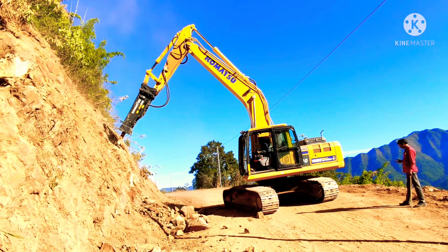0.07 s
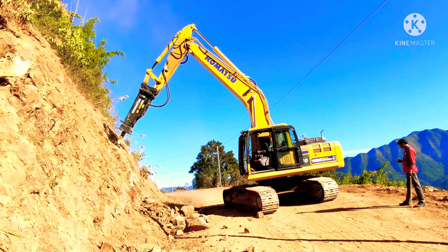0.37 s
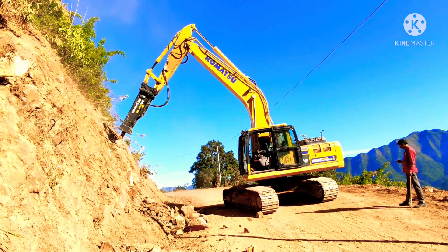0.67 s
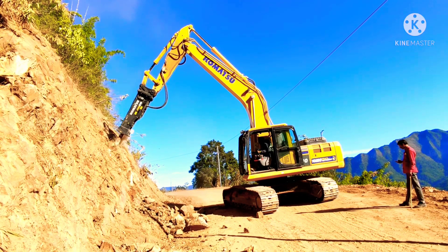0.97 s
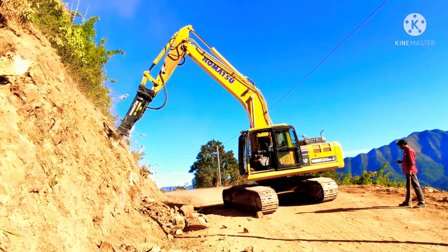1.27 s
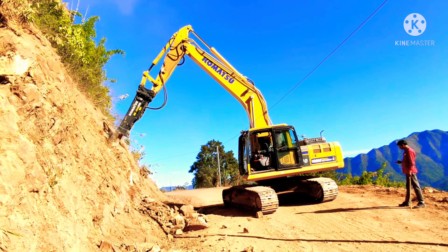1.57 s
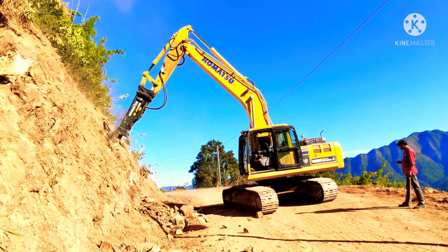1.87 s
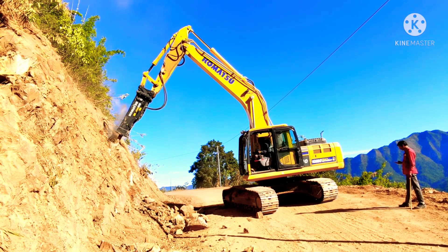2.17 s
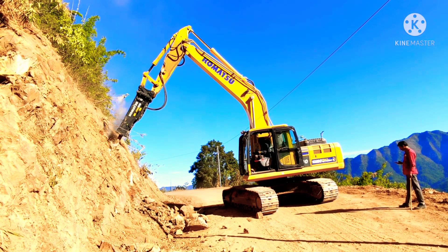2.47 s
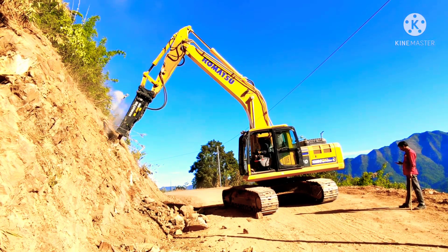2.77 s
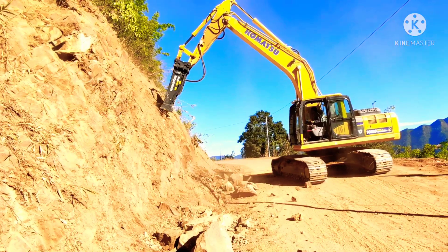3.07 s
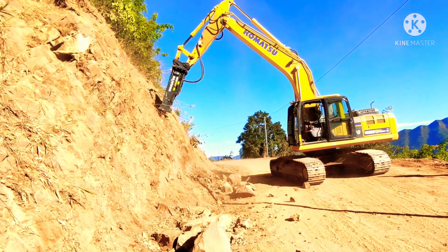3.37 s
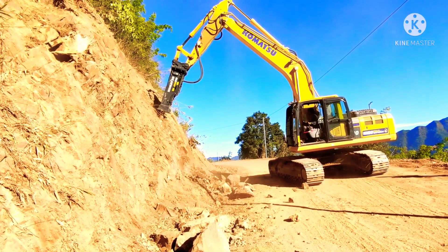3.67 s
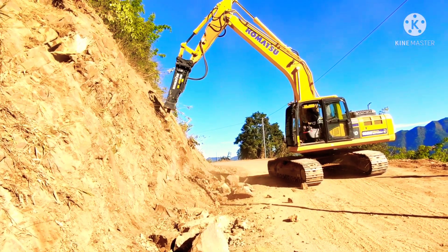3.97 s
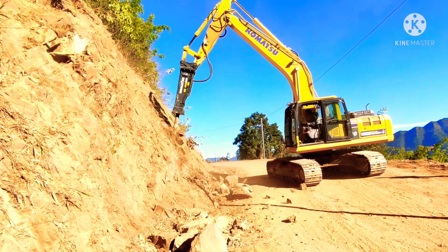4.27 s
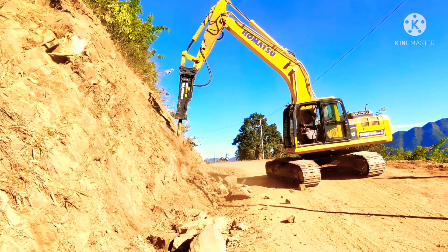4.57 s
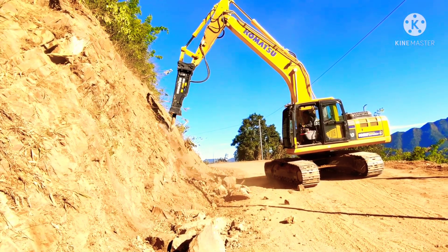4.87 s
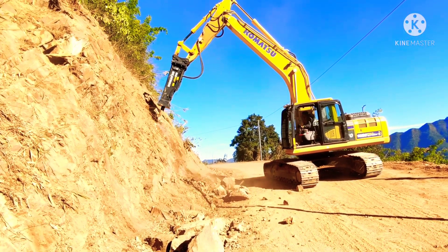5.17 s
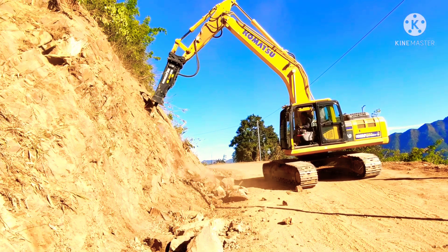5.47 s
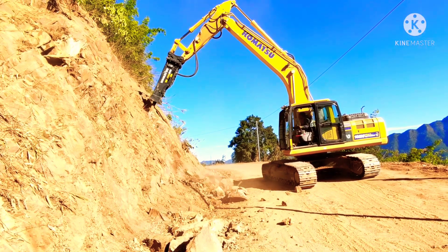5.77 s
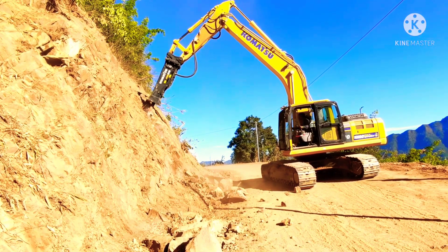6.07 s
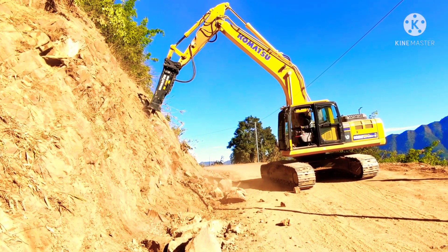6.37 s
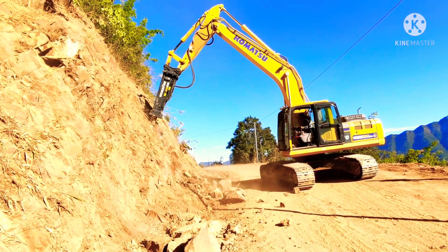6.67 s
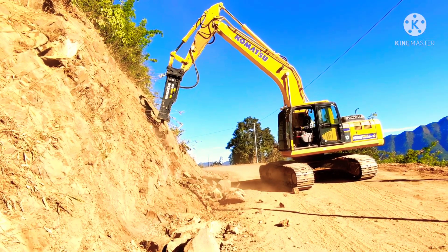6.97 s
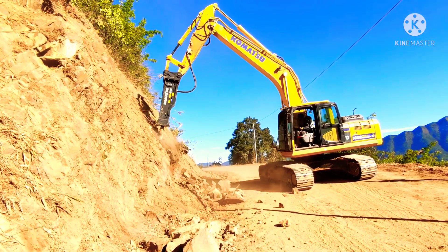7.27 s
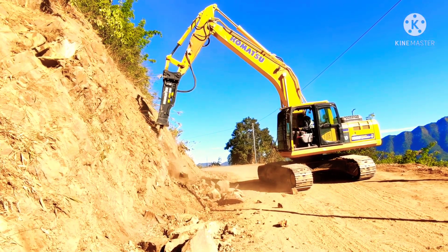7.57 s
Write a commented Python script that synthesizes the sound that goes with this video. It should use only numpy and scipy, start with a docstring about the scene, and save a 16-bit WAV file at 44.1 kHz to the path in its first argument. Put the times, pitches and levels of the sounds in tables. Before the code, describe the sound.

Rapid, sharp metallic blows from a hydraulic breaker strike stone over a rumbling diesel, heard from a moderate distance in the open with a slight echo. After a very brief dip to silence the hammering soon ends, and the steel tip pries at the bank with clangs and scrapes. Rocks split and fall with dull thuds and crunches, heaviest near the end, while the pump whines and valves give high squirts.

```python
"""Hydraulic breaker on a rocky bank

An excavator works some twenty metres away in the open. Its piston hammers the ringing steel chisel
about seven times a second, each blow booming through the breaker's box. The sound fades out and back
in; then the chisel prises at the face, and rocks split, tumble and trail off into rubble and grit.
Underneath, the diesel sags and swells with each load, the pump whines and oil hisses through valves."""
import sys
import numpy as np
from scipy import signal
from scipy.fft import rfft, irfft, next_fast_len
from scipy.io import wavfile

SR = 44100
rng = np.random.default_rng(int(sys.argv[2]) if len(sys.argv) > 2 else 0)


def digitize_waveform(pressure):
    """Quantize a signal to 16-bit integers and store it at the path in sys.argv[1].

    Rows of a 2-D input are taken as channels; values are limited to [-1, 1].
    """
    field = np.atleast_2d(pressure).T
    bounded = np.clip(field, -1, 1)
    quanta = np.round(bounded * 32767).astype(np.int16)
    wavfile.write(sys.argv[1], SR, quanta)


N = 344862
TIME = np.arange(N) / SR
AGE = TIME[:SR * 2 // 5]  # seconds since the start of a single hit
STONE_PATCHY_DB, STONE_PATCH_HZ = 5.5, 150  # depth and width of each stone's own resonances

# rocks breaking off and landing: start_s, level_db, crush (0 whole, 1 ground to pieces), pitch_hz
ROCK_HITS = [(.785, -16.5, 0.51, 360), (0.854, -15, 1, 358.5), (.939, -11.5, 0.54, 340),
             (.995, -15, 0.75, 332), (1.083, -14.5, .3, 320), (1.125, -19, .25, 291),
             (1.241, -21, 0.045, 262), (3.146, -13, 0.42, 186), (4.22, -16.5, 0.6, 370),
             (4.264, -15, 0.57, 367), (4.353, -14, 0.072, 396), (4.492, -26.5, .1, 384),
             (4.535, -22, .05, 332), (4.58, -27.5, 0.054, 352), (4.698, -26.5, 0.95, 306),
             (4.742, -22.5, 0.89, 298), (4.771, -16.5, 1, 249), (4.824, -15, 0.62, 437),
             (5.29, -24, .1, 347), (5.382, -22.5, .1, 332.4), (5.555, -28, .05, 286),
             (5.626, -29.5, .1, 367), (5.71, -32.5, 0.11, 324), (6.25, -20, 0.082, 415),
             (6.592, -10.5, 0.12, 348.6), (6.618, -19.5, 0.3, 400), (6.721, -27.5, 0.98, 377),
             (6.885, -19.5, .11, 357), (6.945, -20, 0.14, 316), (6.988, -15, 0.69, 376),
             (7.015, -17, 0.46, 407), (7.052, -24, 0.34, 317), (7.084, -14.5, 0.48, 330),
             (7.106, -10, 0.57, 337), (7.136, -14, 0.4, 361), (7.284, -12.5, 0.16, 297),
             (7.299, -12.5, 0.017, 365), (7.365, -22, 0.37, 397), (7.453, -18.5, 0.25, 381),
             (7.503, -20, 0.33, 315), (7.549, -29, 0.18, 396), (7.689, -17.5, 0.077, 373),
             (7.73, -31, .05, 297)]
# a boulder's dull thump: freq_hz, density_db
THUMP_SPECTRUM = [(60, -28), (140, -6), (230, -6.5), (300, 0.5), (385, -4.5), (470, -9), (560, -14.5),
                  (690, -8), (850, -10), (1100, -18.5), (1600, -22.5), (3000, -52.5)]
# the crunch of crumbling stone: freq_hz, density_db
CRUNCH_SPECTRUM = [(200, -10), (600, -3.5), (900, -13.5), (1400, 6.5), (1900, -1), (2500, 0.5), (3300, -10),
                   (4100, -8.5), (5500, -17), (7000, -23), (9000, -32), (13000, -43), (16000, -59)]
# the bright crack of a blow or a snapping chip: freq_hz, density_db
CRACK_SPECTRUM = [(35, -30), (110, -6), (800, 13.5), (2400, 2), (3800, 5.5), (6000, 1.5), (7800, 1),
                  (10000, 1), (12400, -9), (13400, -14), (14400, -19), (16000, -55)]


def gain_of(db):
    """Decibels to amplitude."""
    return 10 ** (np.asarray(db) / 20)


def unit_rms(x):
    """Scales to rms 1."""
    return x / np.sqrt(np.mean(x ** 2) + 1e-20)


def automation(points):
    """Joins (time_s, value) points into a curve over the whole scene."""
    return np.interp(TIME, *np.transpose(points))


def value_at(points, hz):
    """Reads (freq_hz, value) points on a log-frequency axis."""
    freq_hz, value = np.transpose(points)
    return np.interp(np.log(hz + 1), np.log(freq_hz + 1), value)


def add(mix, start_s, *sounds):
    """Drops sounds into a stereo mix; a mono sound goes to both channels."""
    for sound in map(np.atleast_2d, sounds):
        part = mix[:, max(round(start_s * SR), 0):][:, :sound.shape[1]]
        part += sound[:, :part.shape[1]]


def wander(rate, t):
    """Random drift of rms 1 that finds a new target rate times a second."""
    knots = np.arange(0, t[-1] + 1, 1 / rate)
    return unit_rms(np.interp(t, knots, rng.standard_normal(len(knots))))


def lagged(x, lag_s):
    """Follows x with the given time constant."""
    keep = np.exp(-1 / (lag_s * SR))
    return signal.lfilter([1 - keep], [1, -keep], x)


def envelope(rise_s, t60_s, hold_until_s=0):
    """Linear attack, optional hold, exponential decay."""
    decaying_s = np.maximum(AGE - max(rise_s, hold_until_s), 0)
    return np.minimum(AGE / rise_s, 1) * gain_of(-60 * decaying_s / t60_s)


def colour(x, spectrum, patchy_db=0, size=4096):
    """Minimum-phase EQ with optional random resonances; white noise keeps its level."""
    hz, knots = abs(np.fft.fftfreq(size, 1 / SR)), np.arange(size // 8)
    bumps = np.clip(rng.standard_normal(len(knots)), -2, 1)
    patches_db = patchy_db * np.interp(hz / STONE_PATCH_HZ, knots, bumps)
    log_gain = np.log(unit_rms(gain_of(value_at(spectrum, hz) + patches_db)))
    taps = np.fft.ifft(np.exp(np.conj(signal.hilbert(log_gain)))).real[:size // 2]
    return signal.oaconvolve(x, taps[None], axes=1)[:, :N]


def stereo_image(pair, lag_ms):
    """Blends two signals into an image that is tight in the bass and wide on top, the left side late."""
    # how alike the two sides are: freq_hz, likeness (0 to 1)
    coherence = [(30, 0), (70, 1), (150, 0.98), (300, 1), (640, 0.57), (1400, 0.57), (4000, 0.16),
                 (15000, 0.02)]
    size = next_fast_len(N + 1000)
    common, other = rfft(pair, size)
    hz = np.fft.rfftfreq(size, 1 / SR)
    likeness = np.clip(value_at(coherence, hz), 0, 1)
    left = common * np.exp(-2j * np.pi * hz * lag_ms / 1000)
    right = likeness * common + np.sqrt(1 - likeness ** 2) * other
    return irfft(np.array([left, right]), size)[:, :N]


def burst(spectrum, db, rise_s, t60_s, grain_db=3, grains_per_s=700, snaps_per_s=0, patchy_db=0):
    """A grainy noise hit, like a clump of tiny fractures, with optional sharp snaps."""
    shape = envelope(rise_s, t60_s)
    clumps = gain_of(grain_db * np.minimum(wander(grains_per_s, AGE), 2))
    triggers = (rng.random(len(AGE)) < snaps_per_s / SR) * rng.uniform(1, 5, len(AGE))
    snaps = signal.lfilter([1], [1, -np.exp(-1 / (.002 * SR))], triggers)
    grains = colour(shape * (clumps + snaps) * rng.standard_normal((2, len(AGE))), spectrum, patchy_db)
    return gain_of(db) * grains * np.linalg.norm(shape) / np.linalg.norm(grains, axis=1, keepdims=True)


def damped_sine(hz, db, t60_s):
    """One struck mode, starting at a random phase."""
    return gain_of(db - 60 * AGE / t60_s) * np.sin(2 * np.pi * (hz * AGE + rng.random()))


def tilted(modes, db_per_khz, pivot_hz):
    """The same modes, brighter or duller about a pivot."""
    return [(hz, db + db_per_khz * (hz - pivot_hz) / 1000, *rest) for hz, db, *rest in modes]


def slope_echoes(x, t60_s, predelay_s):
    """The rough slope and the machine scatter a thin tail of echoes."""
    # tone of the echoes, scooped in the treble: freq_hz, density_db
    echo_spectrum = [(100, -3), (900, 0.5), (3000, -2.5), (7000, -6), (15000, 0.5)]
    taps = rng.standard_normal((2, len(AGE))) * (rng.random((2, len(AGE))) < .05)
    tail = taps * (AGE > predelay_s) * gain_of(-60 * AGE / t60_s)
    echoes = signal.fftconvolve(colour(x, echo_spectrum), tail / np.linalg.norm(tail[0]), axes=1)
    return stereo_image(echoes[:, :N], lag_ms=.22)


def diesel():
    """Exhaust note, body drone, pump whine and clatter, all locked to the crankshaft."""
    # engine speed, dipping under each load: time_s, firing_hz
    speed_points = [(0, 87.7), (.5, 87.8), (.8, 81.3), (1.9, 82.7), (3.3, 89.2), (3.7, 84.7), (3.9, 79.8),
                    (4.1, 85), (4.33, 88), (4.62, 81.8), (4.8, 90.5), (4.98, 85.4), (5.42, 84.2),
                    (5.7, 87.4), (6.42, 88.6), (6.88, 79.3), (7.3, 88.6), (7.8, 87.5)]
    # drone of the engine body: order (multiple of the six-firing cycle), level_db
    body_orders = [(9, -21), (10, -19), (11, -18), (12, 0), (13, -10), (14, -13), (15, -9), (16, -18),
                   (18, -16), (20, -20), (28, -21)]
    # fan and combustion clatter: freq_hz, density_db
    clatter_spectrum = [(25, -29), (55, -28), (80, -12.5), (125, -11), (160, -6.5), (215, -1.5),
                        (300, -10.5), (520, -17), (800, -16), (1240, -22), (2600, -30), (4500, -38.5),
                        (6700, -42), (7300, -55), (8800, -42), (11200, -48), (14500, -51.5), (16000, -75.5)]
    # level ride on the hydraulic pump's whine: time_s, level_db
    pump_ride = [(0, -48), (1, -44.5), (3.2, -46.5), (3.4, -40), (3.68, -37.5), (3.85, -45.5),
                 (4.05, -42.5), (4.25, -32), (4.5, -37), (4.62, -48), (4.74, -31), (4.93, -56), (5.15, -41),
                 (5.45, -47), (5.7, -39.5), (6, -47), (7.8, -45)]
    # level ride on the whole engine: time_s, gain_db
    engine_ride = [(0, 1.5), (.55, 2.5), (1.1, -5), (2.6, 1.5), (7.8, 1.7)]
    unloaded_hz, governor_lag_s = 89, .31
    firing_hz = automation(speed_points)
    # the governor answers a sag with more fuel, so exhaust and clatter swell
    sag_hz = lagged(unloaded_hz - firing_hz, governor_lag_s)
    firing_phase = 2 * np.pi * np.cumsum(firing_hz * (1 + .002 * wander(30, TIME))) / SR
    cycle_phase = firing_phase / 6
    exhaust = gain_of(-40.5 + 1.3 * sag_hz + 1.1 * wander(24, TIME)) * unit_rms(np.sin(firing_phase))
    body = np.zeros(N)
    for order, db in body_orders:
        flutter = 1 + .36 * wander(12, TIME)
        body += gain_of(db) * flutter * np.sin(round(order) * cycle_phase + 2 * np.pi * rng.random())
    drone = gain_of(-30.5 - .26 * sag_hz) * unit_rms(body)
    pump_db = automation(pump_ride) + 2 * wander(50, TIME)
    pump_whine = gain_of(pump_db) * unit_rms(np.sin(36 * cycle_phase + .3 * wander(60, TIME)))
    pump_rasp = gain_of(-55) * unit_rms(wander(400, TIME) * np.sin(180 * cycle_phase))
    puffs = rng.standard_normal((2, N)) * (1 + .25 * np.cos(firing_phase))
    puffs *= gain_of(-33.5 + 1.08 * sag_hz + .9 * wander(40, TIME))
    clatter = stereo_image(colour(puffs, clatter_spectrum), lag_ms=.063)
    engine = exhaust + drone + pump_whine + pump_rasp + clatter
    return engine * gain_of(automation(engine_ride)) * gain_of([[.3], [-.3]])


def oil_squirts():
    """Oil squeezes through the boom's control valves in high, sputtering squeals."""
    # valve movements: start_s, level_db, t60_s
    squirts = [(0.504, -42, 0.18), (4.118, -42, .2), (4.594, -40, 0.58), (4.7, -32, 0.16),
               (4.888, -31.5, 0.2), (5.765, -40, 0.19), (6.86, -44, 0.56), (7.156, -34, 0.19)]
    # hiss with a squealing peak: freq_hz, density_db
    squirt_spectrum = [(3000, -22.5), (4300, -19), (9000, -5.5), (10400, -15), (10850, 6), (11500, -4),
                       (12300, -10), (14000, -16), (16000, -24)]
    hiss = np.zeros((2, N))
    for start_s, db, t60_s in squirts:
        swell = gain_of(db) * envelope(rise_s=.0052, t60_s=t60_s)
        sputter = unit_rms(gain_of(1.5 * wander(100, AGE)))
        add(hiss, start_s, swell * sputter * rng.standard_normal((2, len(AGE))))
    return stereo_image(colour(hiss, squirt_spectrum), lag_ms=.052)


def valve_whistle(start_s=4.897, pitch_hz=10700, waver_hz=40, level_db=-34, t60_s=.3):
    """One valve, nearly shut, sings a thin note that dies away."""
    out = np.zeros((2, N))
    phase = 2 * np.pi * np.cumsum(pitch_hz + waver_hz * wander(200, AGE)) / SR
    swell = np.minimum(AGE / .0052, 1) * gain_of(level_db - 60 * AGE / t60_s)
    add(out, start_s, swell * np.sin(phase))
    return out


def loose_debris(settle_s):
    """How much is moving on the bank: every rock stirs it up, and it settles again."""
    jolts = np.zeros(N)
    for start_s, db, *_ in ROCK_HITS:
        jolts[round(start_s * SR)] += gain_of(db) ** 2
    return np.sqrt(lagged(jolts, settle_s) * settle_s * SR)


def grit(slide_at_s=7.63, slide_width_s=.11):
    """Fine grains trickle in clumps after the rocks, and once slide down in a sheet."""
    # sandy sizzle: freq_hz, density_db
    grit_spectrum = [(500, 1.5), (2500, 9.5), (4200, 3), (7000, -9.5), (8700, 3), (10500, -8), (12500, -3),
                     (15000, -17.5), (16000, -28.5)]
    noise = rng.standard_normal((2, N))
    grains = unit_rms(noise * gain_of(1.1 * wander(1400, TIME) + 2.8 * wander(65, TIME)))
    trickle = gain_of(-41.5) * loose_debris(settle_s=8)
    slide = gain_of(-39.5) * np.exp(-((TIME - slide_at_s) / slide_width_s) ** 2)
    return colour(grains * (trickle + slide), grit_spectrum)


def rubble(stones_per_s=38, ring_s=.033):
    """Small stones bump down the bank at random behind each rock."""
    landings = (rng.random(N) < stones_per_s / SR) * rng.random(N)
    bumps = unit_rms(lagged(landings, ring_s)) * rng.standard_normal((2, N))
    return colour(bumps * gain_of(-14.5) * loose_debris(settle_s=.13), THUMP_SPECTRUM)


def shard(db, count=9, low_hz=800, high_hz=5500, db_per_octave=-4.5, t60_s=.085):
    """A freshly split piece of stone clinks with a few short modes of its own."""
    out = np.zeros((2, len(AGE)))
    spread = (np.arange(count) + rng.random(count)) / count
    for hz in low_hz * (high_hz / low_hz) ** spread:
        mode_db = db + db_per_octave * np.log2(hz / low_hz) - 60 * AGE / t60_s
        out += gain_of(mode_db) * np.sin(2 * np.pi * (hz * AGE + rng.random((2, 1))))
    return out * np.minimum(AGE / .0005, 1)


def slab_knock(pitch_hz):
    """A struck slab of rock rings short and hollow."""
    # slab modes: pitch_ratio, level_db, t60_s
    slab_modes = [(1.001, -0.5, 0.12), (2.028, -7.5, 0.13), (2.95, -21.5, 0.12)]
    tone = sum(damped_sine(ratio * pitch_hz, db, t60_s) for ratio, db, t60_s in slab_modes)
    return tone * np.minimum(AGE / .003, 1) * (1 + .3 * wander(150, AGE))


def box_boom():
    """The steel box rings low after a jolt, a little differently each time."""
    # modes of the breaker's box and the excavator's arm: pitch_hz, level_db, t60_s
    box_modes = [(256.2, -7.5, 0.86), (293.4, -9, 0.8), (324.3, -12, 0.97), (349.6, -6.5, 0.89),
                 (379.6, -4, 0.83), (432.5, -8, 0.53), (456, -13, .4), (528.6, -17.5, 0.28),
                 (674.5, -9.5, 0.64), (731, -7, 0.35), (819, -11.5, 0.39), (901, -5, 0.33),
                 (1160, -17, 0.28), (1264, -14, 0.43)]
    tone = sum(damped_sine(hz * rng.normal(1, .0019), db, t60_s) for hz, db, t60_s in box_modes)
    return tone * np.minimum(AGE / .00065, 1)


def rockfall():
    """Rocks knock, thump and crunch, stone splits, chips snap off, and rubble and grit run after them."""
    # stone splitting with a dry crack: start_s, level_db
    splits = [(0.863, -26), (1.01, -29), (4.229, -26.5), (4.284, -22), (4.746, -27.5), (4.775, -16.5),
              (4.782, -22.5), (4.832, -19.5), (4.845, -19), (6.252, -21.5), (6.597, -24), (6.626, -21.5),
              (7.001, -17), (7.021, -18), (7.06, -24), (7.111, -24.5), (7.119, -22), (7.145, -15),
              (7.286, -18.5), (7.454, -28.5), (7.55, -20)]
    # the body of that crack: freq_hz, density_db
    split_spectrum = [(200, -18), (450, 4), (750, 2.5), (1400, 4), (2400, -6.5), (3500, -33), (5500, -26),
                      (8000, -29), (16000, -59)]
    # sharp cracks, of chips snapping off and of the hardest chisel knocks: start_s, level_db
    chips = [(3.495, -35.5), (4.347, -29), (4.672, -33), (4.696, -32), (5.378, -36), (6.757, -30),
             (7.289, -27.5), (7.552, -34), (7.806, -29)]
    thump, crunch = np.zeros((2, 2, N))
    for start_s, db, crush, pitch_hz in ROCK_HITS:
        # a crushed rock rings less; its thud is slower, longer and crunchier
        knock = gain_of(db + 3 - 6.5 * crush) * slab_knock(pitch_hz)
        jolt = gain_of(db - 14) * box_boom()  # stone giving way shakes the steel box
        rise_s, t60_s = .0058 + .0054 * crush, .23 + .045 * crush
        thud = burst(THUMP_SPECTRUM, db - 2.5, rise_s, t60_s, grain_db=0, grains_per_s=380)
        add(thump, start_s, knock, jolt, thud)
        add(crunch, start_s, burst(CRUNCH_SPECTRUM, db - 18.5 + 16.5 * crush, rise_s, t60_s,
                                   snaps_per_s=20, patchy_db=STONE_PATCHY_DB))
    for start_s, db in splits:
        crack = burst(split_spectrum, db, rise_s=.0006, t60_s=.056,
                      grain_db=4.5, patchy_db=STONE_PATCHY_DB)
        add(crunch, start_s, crack, shard(db - 5))
    for start_s, db in chips:
        add(crunch, start_s, burst(CRACK_SPECTRUM, db, rise_s=.00041, t60_s=.058))
    weight = stereo_image(thump + rubble(), lag_ms=.13) * gain_of([[.5], [-.5]])
    texture = stereo_image(crunch + grit(), lag_ms=.282) * gain_of([[1.3], [-1.3]])
    return weight + texture


def box_groans(pitch_hz=376, octave_db=-13):
    """The tip sticks and slips along the face, driving the strongest mode of the steel box."""
    # judders of the tip: start_s, level_db, length_s
    judders = [(6.71, -28.5, .07), (7.324, -14.5, 0.059), (7.403, -34, .08)]
    out = np.zeros((2, N))
    for start_s, db, length_s in judders:
        swell = gain_of(db) * envelope(rise_s=.0086, t60_s=.16, hold_until_s=length_s)
        phase = 2 * np.pi * np.cumsum(pitch_hz * (1 + .015 * wander(60, AGE))) / SR
        tone = np.sin(phase) + gain_of(octave_db) * np.sin(2 * phase)
        add(out, start_s, swell * tone * (1 + .13 * wander(80, AGE)))
    return out


def chisel_ring(modes, scatter_rad, chatter, chatter_s, free_s=0, sharp_hz=0, uneven_db=0):
    """Steel modes that lose little while the chisel is off the rock and die fast once pressed back."""
    free_loss, detune = .15, .00039  # share of the pressed damping; pitch spread between contacts
    damped_s = free_loss * np.minimum(AGE, free_s) + np.maximum(AGE - free_s, 0)
    overshoot = 1 + .67 * np.exp(-AGE / .0062)
    rattle = chatter * np.exp(-AGE / chatter_s)
    sides = np.array([[.5], [-.5]])
    out = np.zeros((2, len(AGE)))
    for hz, db, t60_s, pan_db, lead_rad in modes:
        # the path to each side changes a little from hit to hit
        phase = 2 * np.pi * rng.random() + sides * (lead_rad + scatter_rad * rng.standard_normal())
        # chatter in the bushing roughens each mode at the strike, then leaves it pure
        roughness = 1 + rattle * (wander(290, AGE) + 1j * wander(320, AGE))
        pitch_hz = hz * rng.normal(1, detune) + sharp_hz
        tone = (roughness * np.exp(1j * (2 * np.pi * pitch_hz * AGE + phase))).real
        mode_db = db + uneven_db * rng.uniform(-1.2, 1) + sides * pan_db
        out += overshoot * gain_of(mode_db - 60 * damped_s / t60_s) * tone
    return out


def chisel_knocks(dulling_per_khz=.84, pivot_hz=3500):
    """The prising chisel slips and its bending modes clang over a scrape, duller on softer knocks."""
    # sideways slips: start_s, level_db, low_db (extra for the modes below the pivot), rise_s
    slips = [(4.349, -23, -3, 0.0011), (4.474, -23.5, -6, 0.017), (5.287, -26.5, 2, 0.018),
             (5.377, -24, -1.5, 0.0027), (6.618, -30, -22, .0036), (7.682, -28, -3.5, .0023)]
    # the chisel's bending modes: pitch_hz, level_db, t60_s, pan_left_db, left_lead_rad
    bending_modes = [(1990, -13, .1, 0, -1), (2530, -9, .06, 1, -1), (2993, -12, .15, 0, -1.4),
                     (3101, 3.5, .19, 0, -1.2), (3208, -11, .12, 0, -1.4), (3811, -10, .15, 1, -1),
                     (3960, -5, .08, 1, -1.4), (4229, -1, .23, 1, -1.6), (5033, -9, .06, 0, 1.5),
                     (5911, -18, .2, 0, 1.5), (7784, -14, .21, -2, 1.5), (8280, -20, .2, -2, 1.5),
                     (8979, -14, .25, -2, 1.5), (10800, -20, .22, 0, 1)]
    # steel scraping on stone: freq_hz, density_db
    scrape_spectrum = [(300, -10), (900, 7), (2000, -2), (3200, -1), (4300, -9), (5500, -12), (9000, -17),
                       (16000, -50)]
    steel, scrape = np.zeros((2, 2, N))
    hardest_db = max(db for _, db, *_ in slips)
    for start_s, db, low_db, rise_s in slips:
        modes = tilted(bending_modes, dulling_per_khz * (db - hardest_db), pivot_hz)
        modes = [(hz, level + low_db * (hz < pivot_hz), *rest) for hz, level, *rest in modes]
        clang = chisel_ring(modes, scatter_rad=.3, chatter=.45, chatter_s=.05)
        add(steel, start_s, gain_of(db) * np.minimum(AGE / rise_s, 1) * clang)
        add(scrape, start_s, burst(scrape_spectrum, db - 6.5, rise_s, t60_s=.31,
                                   patchy_db=STONE_PATCHY_DB))
    return steel + stereo_image(scrape, lag_ms=.36)


def breaker():
    """Each stroke: the valve spits, the piston cracks, the chisel rings, the housing thuds."""
    # piston blows: start_s, strength_db, free_s (how long the chisel rings clear of the rock)
    blows = [(0.778, -4, 0.071), (.922, -4, 0.067), (1.061, -3, 0.061), (1.199, -2.5, .018),
             (1.333, -3, 0.0035), (1.463, -3, 0.02), (1.595, -2, 0.011), (1.728, -2, 0.014),
             (1.865, -2.5, .003), (2.005, -2.5, 0.0062), (2.153, -2, 0.005), (2.306, -1, 0.0027),
             (2.475, -1.5, 0.0023), (2.714, -1.5, .002), (2.996, -9, 0.0017), (3.149, -6.5, 0.0048)]
    # lengthwise chisel modes: pitch_hz, level_db, t60_s (pressed on rock), pan_left_db, left_lead_rad
    lengthwise_modes = [(2304, -8, .11, 3, -1.4), (2428, -17, .08, 1, -1), (2970, -13, .12, 0, -2),
                        (3098, -13, .09, 0, -2), (3215, -12, .09, 0, -2), (3400, -17, .1, 0, -2),
                        (4229, -13, .09, 1, 2.6), (4406, -1.5, .1, 4, 2.4), (4470, -9, .06, 4, 2.4),
                        (4570, -12, .07, 2, 2.4), (5445, -16, .11, 2, 2), (5720, -15, .11, 2, 2),
                        (6666, .5, .11, -7, 3.1), (8560, -16, .06, -2, 2), (8912, -5.5, .08, -9, 2.8),
                        (9330, -18, .06, 0, 1), (10150, -19, .06, 0, 1), (10795, -10, .07, 3, -.8),
                        (11650, -18, .05, -2, -1), (12567, -10, .07, 0, -1.4), (13900, -28, .06, 0, -1),
                        (14320, -18, .075, 2, -1), (14500, -26, .05, 0, -1), (15122, -28, .06, 0, -1)]
    # the spit of the oil valve: freq_hz, density_db
    valve_spectrum = [(200, 5), (600, 12), (790, 7), (920, 19.5), (1100, -3), (1500, -1.5), (2700, -2.5),
                      (5000, -9), (7500, -12.5), (10000, -8.5), (12000, -7), (13500, -29), (16000, -21)]
    # the thud of the housing: freq_hz, density_db
    housing_spectrum = [(40, -50.5), (110, 4), (240, 0.5), (345, -2), (378, 4.5), (410, 2), (580, -9),
                        (730, -8.5), (820, 2.5), (907, -4), (1050, -7), (1800, -17.5), (3000, -35.5),
                        (7000, -60)]
    seating_s, seated_sharp_hz, sharpening_s = .12, 21, .5
    sinking_db_per_s, crack_growth_db_per_s = 3.5, 4
    steel, noise = np.zeros((2, 2, N))
    for start_s, db, free_s in blows:
        worked_s = start_s - blows[0][0]
        valve_lead_s = .026 + .0065 * worked_s  # the valve opens earlier as the strokes slow down
        add(noise, start_s - valve_lead_s, burst(valve_spectrum, db - 16.5, rise_s=.0042, t60_s=.2))
        # as the chisel sinks in, the contact hardens: the crack grows, ring and crumble recede
        crack_db = db - 21 + crack_growth_db_per_s * worked_s
        sunk_db = db - sinking_db_per_s * worked_s
        crack = burst(CRACK_SPECTRUM, crack_db, rise_s=.0005, t60_s=.034, grain_db=1.5)
        thud = burst(housing_spectrum, db - 17, rise_s=.00091, t60_s=.25, grain_db=-1.5)
        crumble = burst(CRUNCH_SPECTRUM, sunk_db - 17, rise_s=.0026, t60_s=.23,
                        patchy_db=STONE_PATCHY_DB)
        boom = gain_of(db - 17) * box_boom()
        add(noise, start_s, crack, thud, crumble, boom, shard(db - 22))
        # the ring starts dull, then brightens and goes sharp; packed rock damps the low modes most
        tilt_db_per_khz = .1 - 1.1 * np.exp(-worked_s / seating_s) + .11 * worked_s
        modes = tilted(lengthwise_modes, tilt_db_per_khz, pivot_hz=7800)
        sharp_hz = seated_sharp_hz * min(worked_s / sharpening_s, 1) ** 2
        ring = chisel_ring(modes, scatter_rad=.35, chatter=.6, chatter_s=.035,
                           free_s=free_s, sharp_hz=sharp_hz, uneven_db=2)
        add(steel, start_s, gain_of(sunk_db - 14) * ring)
    return steel + stereo_image(noise, lag_ms=.23)


def scene():
    """The work at the rock face with its echoes, over the running machine."""
    work = breaker() + chisel_knocks() + box_groans() + rockfall()
    echoes = gain_of(-15) * slope_echoes(work, t60_s=.41, predelay_s=.0093)
    return work + echoes + diesel() + oil_squirts() + valve_whistle()


def record(dry):
    """Soft saturation, a fade to a moment of near silence and back, and a steep low-pass."""
    ceiling, cutoff_hz = 1.2, 15900
    silent_from_s, silent_to_s, floor_db = 2.84, 2.942, -60
    fade_out_s, fade_in_s, fade_bend = .11, .084, .77
    fade_out = (silent_from_s - TIME) / fade_out_s
    fade_in = (TIME - silent_to_s) / fade_in_s
    fader = np.clip(np.maximum(fade_out, fade_in), 0, 1) ** fade_bend + gain_of(floor_db)
    saturated = ceiling * np.tanh(dry / ceiling)
    lowpass = signal.firwin(255, cutoff_hz, window=("kaiser", 9), fs=SR)
    return signal.oaconvolve(saturated * fader, lowpass[None], "same")


dry = scene()
out = record(dry)
digitize_waveform(out)
```